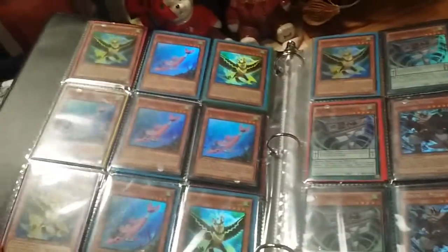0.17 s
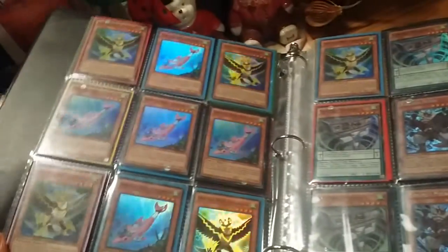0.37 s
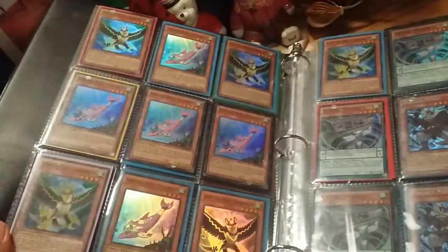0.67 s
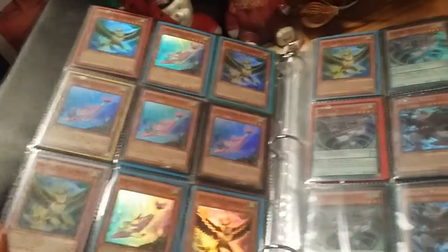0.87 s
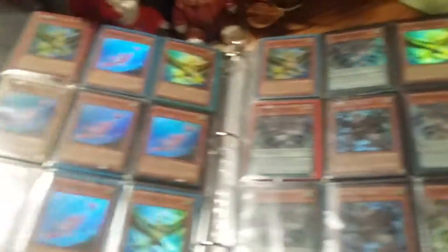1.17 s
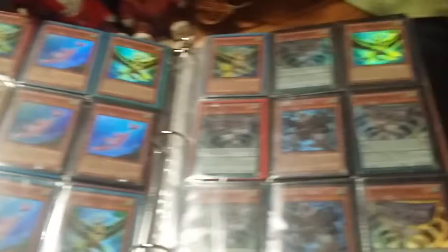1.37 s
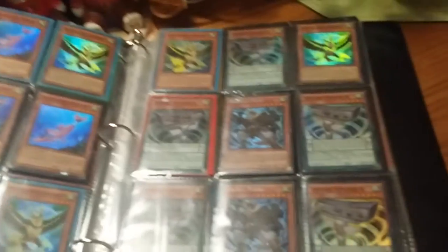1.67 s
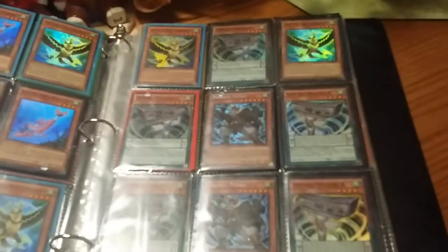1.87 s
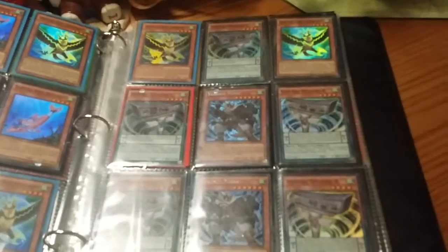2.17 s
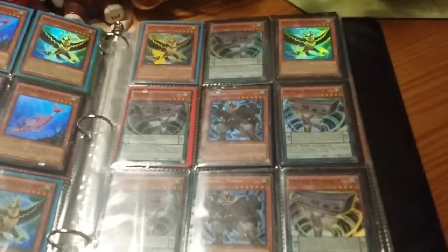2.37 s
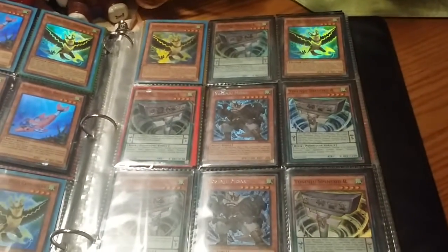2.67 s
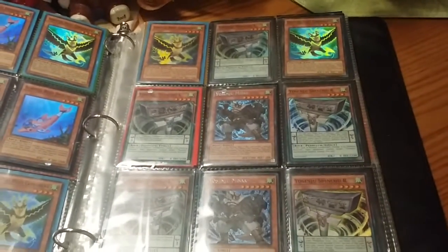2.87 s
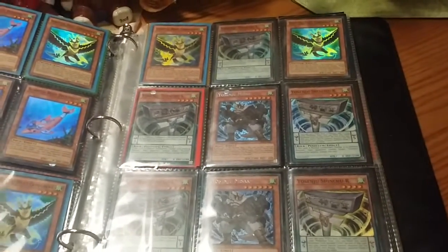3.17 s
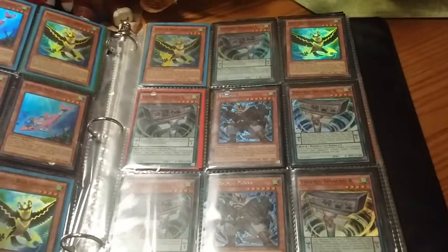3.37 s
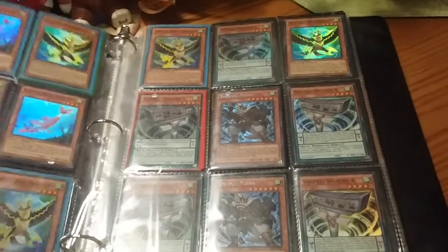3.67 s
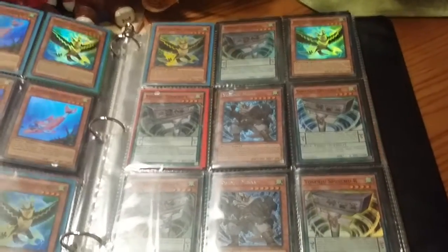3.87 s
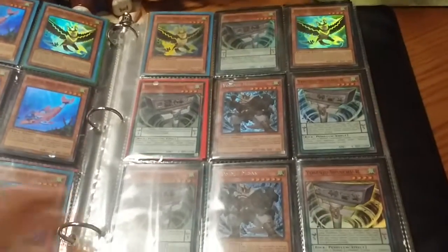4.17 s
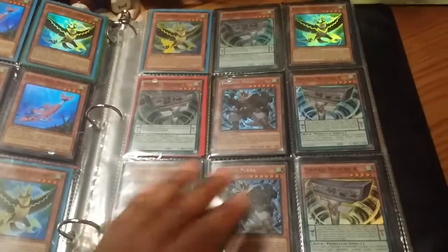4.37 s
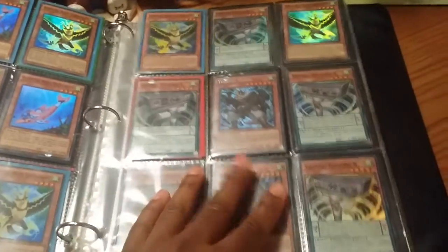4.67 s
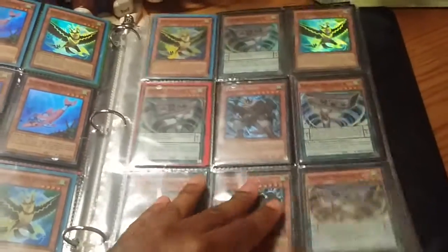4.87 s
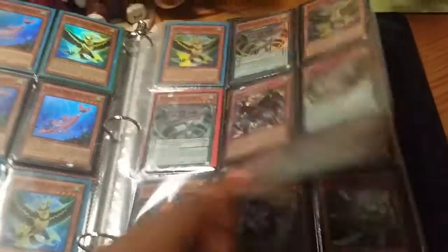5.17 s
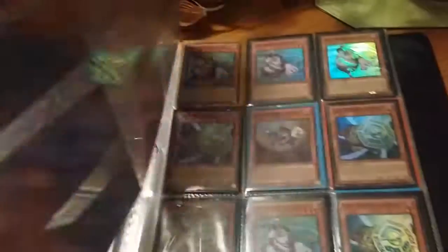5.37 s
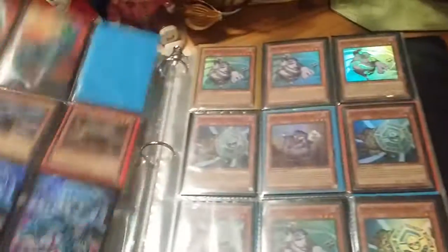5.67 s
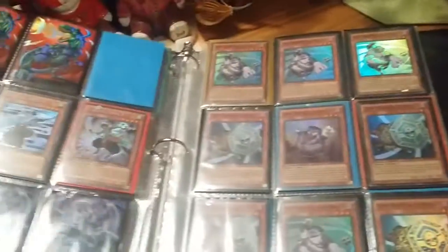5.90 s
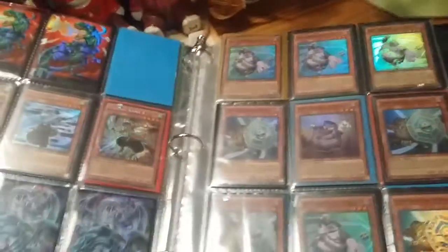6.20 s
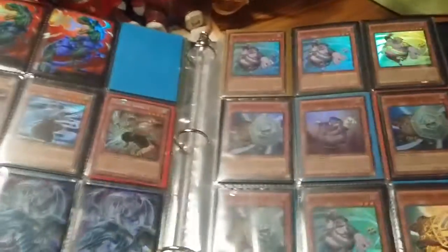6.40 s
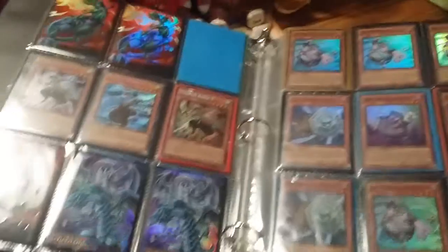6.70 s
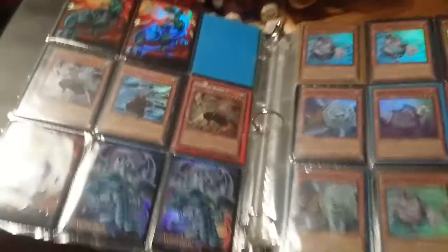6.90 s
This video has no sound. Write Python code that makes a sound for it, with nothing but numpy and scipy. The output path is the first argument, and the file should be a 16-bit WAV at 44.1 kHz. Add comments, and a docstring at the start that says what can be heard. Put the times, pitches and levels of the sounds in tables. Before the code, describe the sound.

Close plastic card pockets rub faintly over a humming room, a hard knock sounds, then a page crackles, flips and slides to rest.

```python
"""A ring binder of sleeved cards lies close by on a table: its plastic pockets slide and crackle,
the binder knocks, and a page is gripped, bent over and left to slide to rest.
Snaps are short noise cracks through film and card colours, sliding is dense random grains, and
knocks are decaying tones with a rattle. Behind it, noise bands make dull scuffs and bumps further off,
and steady tones with coloured noise make the humming room."""
import sys
import numpy as np
from scipy import signal
from scipy.fft import rfft, irfft, next_fast_len
from scipy.io import wavfile
from scipy.ndimage import map_coordinates

SR = 44100
rng = np.random.default_rng(int(sys.argv[2]) if len(sys.argv) > 2 else 0)


def generate_wav(signal):
    """Clip the signal to [-1, 1] and save it as 16-bit WAV at the path in sys.argv[1]."""
    frames = np.transpose(np.atleast_2d(signal))
    scaled = np.clip(frames, -1, 1) * 32767
    pcm = np.round(scaled).astype(np.int16)
    wavfile.write(sys.argv[1], SR, pcm)


N = 310464

# All t60 values are the time [s] to fade by 60 dB; levels are relative unless marked rms.
# appliance motors and mains, the two lowest lines beat: (frequency [Hz], level [dB])
HUM_LINES = [(58.2, -56.7), (61.8, -58.6), (120, -51.3), (210.8, -63), (226.9, -55), (240, -56),
             (269.1, -43.6), (359.9, -57), (450.8, -61), (479.9, -62)]
# narrow bands of the room's drone: (centre [Hz], width [Hz], level [dB rms])
DRONE_BANDS = [(56.7, 8.1, -66), (120.7, 8.1, -64), (254.8, 48, -56), (326, 26, -62.5),
               (362.8, 10.6, -60.5), (580, 79, -64.5), (691, 10, -70)]
# colour of fan air and hiss: (frequency [Hz], level per Hz [dB])
AIR_COLOUR = [(450, -16.5), (800, 3), (1100, 1), (1700, 0), (2200, -5.5), (3000, -7), (4000, -9.5),
              (5200, -12), (7200, -18.5), (9000, -14), (11000, -11.5), (13500, -8.5), (15000, -20.5)]
# colour of the room's low rumble: (frequency [Hz], level per Hz [dB])
RUMBLE_COLOUR = [(25, -21), (40, -10), (55, 7), (90, -2), (140, 3), (190, -0.5), (300, 0.5), (420, -2),
                 (560, -7), (750, -12.5), (1000, -21.5), (2000, -68)]
# dull scuffs and bumps: (time [s], level [dB], centre [Hz], rise [s])
SCUFF_EVENTS = [(0.146, -51.5, 940, 0.018), (0.285, -53, 1770, 0.013), (0.45, -57.5, 1400, 0.046),
                (1.181, -53.5, 1370, 0.02), (1.3, -40, 140, 0.017), (1.275, -49.5, 1350, 0.029),
                (1.55, -55.5, 1340, 0.051), (1.729, -51, 920, 0.068), (1.87, -51, 1170, 0.035),
                (2.222, -44.5, 1060, 0.034), (2.315, -48.5, 1280, 0.021), (2.519, -54, 1220, 0.062),
                (3.947, -40.5, 1660, 0.003), (4.172, -50, 1880, 0.0025), (6.31, -54, 900, 0.0098)]
# how long the room answers: (frequency [Hz], t60 [s])
ROOM_DECAY = [(200, 0.16), (2000, 0.15), (12000, 0.084)]
# the binder meets the table, the page lands on the stack: (time [s], level [dB])
KNOCK_EVENTS = [(1.307, -31), (3.661, -31), (3.718, -16.5), (5.6912, -34), (5.7143, -46)]
# ringing tones of the stiff cover: (frequency [Hz], level [dB], t60 [s])
BOARD_TONES = [(185, -18, 0.13), (485, -11, 0.054), (596, -6, 0.05), (667, -5.5, 0.031), (991, -11.5, 0.05),
               (1600, -16, 0.019), (2070, -19, 0.027)]
# cards clack and slap together: (time [s], level [dB], centre [Hz], half-width [octaves], t60 [s])
CLACK_EVENTS = [(3.5275, -38, 1890, 0.54, 0.017), (3.5374, -42, 1700, 0.45, 0.055),
                (4.782, -40, 4400, 0.33, 0.017), (4.866, -42, 4160, 0.1, 0.045),
                (4.8775, -29, 2170, 0.2, 0.016), (4.8784, -34, 10400, 0.074, 0.012),
                (5.2056, -37.5, 2190, 0.35, 0.0096), (5.462, -41.5, 1700, 0.9, 0.035),
                (5.495, -36, 1730, 0.49, 0.027), (5.691, -35, 4600, 0.45, 0.009),
                (5.691, -40.5, 1400, 0.34, 0.072), (5.7075, -35, 1190, 0.5, 0.027),
                (5.7144, -30, 4150, 0.4, 0.0077), (5.7147, -37.5, 1340, 0.51, 0.082),
                (6.9141, -37, 1150, 0.31, 0.013)]
# the bent film crinkles in runs of ticks: (time [s], length [s], level [dB], middle pitch [Hz])
CRINKLE_RUNS = [(4.774, 0.04, -39, 4330), (4.851, 0.02, -38, 3200), (5.211, 0.05, -40, 3000),
                (5.419, 0.016, -37, 4030), (5.692, 0.035, -39, 2200)]
# the plastic buckles: (time [s], snap level [dB], card level against the snap [dB])
SNAP_EVENTS = [(0.648, -40, -12), (1.627, -37, -18), (3.512, -37, -3), (3.5376, -37, 4), (3.5525, -41, -6),
               (3.6507, -30, 4), (3.6615, -23.5, -2), (3.7467, -25, 1), (3.765, -22.5, 2), (4.791, -35, -5),
               (4.8105, -41, -8), (4.853, -32, 0.5), (4.8794, -26, -2), (5.2056, -31.5, 1),
               (5.2305, -35, 1), (5.4192, -37, 2), (5.5844, -44, 13), (5.684, -29, 1), (5.6902, -23, -5),
               (5.7142, -33, 0), (6.9134, -30, -8)]
# colour of thin plastic: (frequency [Hz], level per Hz [dB])
FILM_COLOUR = [(300, -46), (1500, -2), (2300, -11), (3000, 0), (4100, 9.5), (5500, -11.5), (7000, -2.5),
               (10000, 4), (13300, 11), (15000, -8)]
# colour of card in its pocket: (frequency [Hz], level per Hz [dB])
CARD_COLOUR = [(150, -11), (500, 1), (1100, -1), (2000, -1.5), (3000, -11), (4500, -14), (8000, -21)]
# pockets rub as the binder shifts: (time of full speed [s], swish [dB], card [dB], t60 [s])
SHIFT_STROKES = [(0.403, -60, -51, 0.26), (1.05, -56.5, -56, 0.41), (1.345, -65, -53.5, 0.35),
                 (1.62, -70, -64, 0.2), (2.818, -61, -52.5, 0.49), (4.018, -59, -53, 0.27),
                 (4.462, -59, -64, 0.28), (6.44, -63, -54.5, 1)]
# colour of pockets pressed together: (frequency [Hz], level per Hz [dB])
RUB_COLOUR = [(600, -6), (2000, 1), (4000, -2.5), (6000, -9.5), (9000, -8), (13500, -6)]
# a rubbed pocket sings at its own resonance: (time [s], level [dB], centre [Hz], half-width [octaves])
SING_EVENTS = [(0.38, -57.5, 4140, 0.14), (1.028, -53, 2010, 0.31), (1.035, -55, 3200, 0.3),
               (4.44, -58, 12500, 0.28)]
# fingers crease the page until it snaps free: (time of full speed [s], crackle [dB], card [dB], t60 [s])
GRIP_STROKES = [(4.808, -45.5, -64, 0.2), (4.85, -40.5, -61, 0.046), (4.871, -45, -59, 0.025)]
# colour of a pinched pocket: (frequency [Hz], level per Hz [dB])
CREASE_COLOUR = [(800, -24), (1700, -8), (2400, 2), (3200, 1), (4300, -3), (5500, -5), (7000, -3),
                 (9000, -13), (13000, -4), (15000, -11)]
# the page is touched, lifted, bent over: (time of full speed [s], swish [dB], card [dB], t60 [s])
TURN_STROKES = [(4.787, -48.5, -63, 0.3), (5.218, -51.5, -56.5, 0.36), (5.32, -61, -63.5, 1),
                (5.421, -53, -58, 0.16)]
# the turned page slides to rest in surges: (time of full speed [s], swish [dB], card [dB], t60 [s])
GLIDE_STROKES = [(5.648, -52, -54.5, 0.78), (5.775, -51, -64, 0.29), (5.915, -54, -58.5, 0.47),
                 (5.978, -56, -58, 0.061), (6.065, -57.5, -56, 0.35)]
# colour of a page sliding flat: (frequency [Hz], level per Hz [dB])
SATIN_COLOUR = [(1000, -10), (4200, -5), (7000, -12), (9500, -2), (11500, -3), (13500, 6), (15000, -16)]

# Where a snap's treble starts to fall; it halves for each DULLING_DB more of card behind the film.
EDGE_HZ, DULLING_DB = 8300, 17
# Half-width of a low scuff; a scuff centred on NARROW_HZ is half as wide.
SCUFF_OCTAVES, NARROW_HZ = 1.32, 1440
SCUFF_T60 = 0.32  # seconds
SCUFF_HOLD = 0.54  # full strength lasts this share of the rise time
CLACK_RISE_S = 0.0001
CATCHES_PER_S = 83  # how fast a sliding sheet catches and frees itself
TOP_HZ = 14850


def amp(db):
    """Turn decibels into a plain multiplier."""
    return 10 ** (np.asarray(db) / 20)


def unit(x):
    """Scale a sound to an average (rms) strength of 1."""
    return x / np.sqrt(np.mean(x ** 2) + 1e-20)


def along(points, hz):
    """Read between (frequency, value) points, evenly by pitch."""
    f, value = np.transpose(points)
    return np.interp(np.log(hz + 1), np.log(f + 1), value)


def wobble(rate):
    """Draw a smooth random curve through this many random points a second."""
    knots = rng.standard_normal(int(N * rate / SR) + 4)
    return map_coordinates(knots, [np.arange(N) * rate / SR])


def filtered(x, response):
    """Make each frequency louder or softer by the given response."""
    size = next_fast_len(len(x) + 8192)
    spectrum = rfft(x, size) * response(np.fft.rfftfreq(size, 1 / SR))
    return irfft(spectrum, size)[:len(x)]


def coloured(x, colour):
    """Give a sound a frequency colour, at rms 1."""
    return unit(filtered(x, lambda hz: amp(along(colour, hz))))


def struck(x, colour, size=1024):
    """Pass a sound through a body that answers only after it is hit, with unit energy."""
    cepstrum = irfft(np.log(amp(along(colour, np.fft.rfftfreq(size, 1 / SR)))))
    # Folding this onto positive times puts the answer as early as possible.
    cepstrum[1:size // 2] *= 2
    cepstrum[size // 2 + 1:] = 0
    response = irfft(np.exp(rfft(cepstrum)))
    return signal.fftconvolve(x, response / np.linalg.norm(response))[:len(x)]


def add(track, s, sound):
    """Mix a sound into a track at time s."""
    part = track[round(s * SR):][:len(sound)]
    part += sound[:len(part)]


def burst(centre_hz, octaves, rise, t60, hold=0):
    """A band of noise rises, holds and dies away."""
    t = np.arange(SR // 2) / SR

    def band_shape(hz):
        distance = np.abs(np.log2((hz + 1) / centre_hz) / octaves)
        return 1 / (1 + distance ** 3.48)

    band = unit(filtered(rng.standard_normal(len(t)), band_shape))
    fade = amp(-60 * np.maximum(t - rise - hold, 0) / t60)
    return band * np.minimum(t / rise, 1) * fade


def hum(line_db, waver_db, air_db, rumble_db):
    """Steady motor tones waver slightly over a drone, the fan's air noise and rumble."""
    t = np.arange(N) / SR
    lines, drone = np.zeros(N), np.zeros(N)
    for hz, db in HUM_LINES:
        tone = np.sqrt(2) * np.sin(2 * np.pi * (hz * t + rng.random()))
        lines += amp(db + waver_db * wobble(3.22)) * tone
    for hz, width, db in DRONE_BANDS:
        band = filtered(rng.standard_normal(N), lambda f: 1 / (1 + (2 * (f - hz) / width) ** 4))
        drone += amp(db) * unit(band)
    air = amp(air_db + 0.79 * wobble(3.9)) * coloured(rng.standard_normal(N), AIR_COLOUR)
    rumble = amp(rumble_db) * coloured(rng.standard_normal(N), RUMBLE_COLOUR)
    return amp(line_db) * lines + drone + air + rumble


def scuffs(level_db):
    """Soft contacts swell and die away, blurred by the room; the higher ones are narrower."""
    out = np.zeros(N)
    for s, db, centre_hz, rise in SCUFF_EVENTS:
        octaves = SCUFF_OCTAVES / (1 + (centre_hz / NARROW_HZ) ** 3)
        add(out, s, amp(db + level_db) * burst(centre_hz, octaves, rise, SCUFF_T60, SCUFF_HOLD * rise))
    return out


def room(x):
    """A small furnished room answers with a fading noise tail; the treble dies first."""
    hz, t, noise = signal.stft(rng.standard_normal(SR // 2), SR, nperseg=256)
    fade = amp(-60 * t / along(ROOM_DECAY, hz)[:, None])
    tail = signal.istft(noise * fade, SR, nperseg=256)[1]
    delayed = np.pad(tail / np.linalg.norm(tail), (SR // 200, 0))  # 5 ms late
    return signal.fftconvolve(x, delayed)[:N]


def knocks(attack, rattle_db, rattle_t60, soft_hz):
    """The stiff cover rings briefly and the stacked cards clap against it."""
    out, t = np.zeros(N), np.arange(SR // 4) / SR
    rattle_colour = [(150, -13), (550, -4), (1200, 8.0), (2300, -33), (6000, -42)]  # (Hz, dB per Hz)
    ring = np.zeros(len(t))
    for hz, level, t60 in BOARD_TONES:
        ring += amp(level - 60 * t / t60) * np.cos(2 * np.pi * hz * t)
    for s, db in KNOCK_EVENTS:
        rattle = coloured(rng.standard_normal(len(t)), rattle_colour)
        rattle = rattle * amp(rattle_db - 60 * t / rattle_t60)
        add(out, s, amp(db) * (1 - np.exp(-t / attack)) * (ring + rattle))
    return signal.lfilter(*signal.butter(2, soft_hz, fs=SR), out)  # the padded cover takes the edge off


def clacks(level_db):
    """A card's edge strikes its neighbour; a sheet falling flat rings lower and longer."""
    out = np.zeros(N)
    for s, db, centre_hz, octaves, t60 in CLACK_EVENTS:
        add(out, s, amp(db + level_db) * burst(centre_hz, octaves, CLACK_RISE_S, t60))
    return out


def crinkles(gap_s, spread_db, octaves, cycles):
    """Small dents flip one after another at uneven gaps, each with its own size and pitch."""
    out, t = np.zeros(N), np.arange(SR // 100) / SR
    for s, length, db, centre_hz in CRINKLE_RUNS:
        gaps, sizes, pitches = np.clip(rng.standard_normal(size=(3, 32)), -2, 2)
        delays = gap_s * (np.cumsum(np.exp(gaps / 2)) - 1)
        tick_hz = centre_hz * 2 ** (octaves * pitches)
        for delay, size, hz in zip(delays, sizes, tick_hz):
            if delay < length:
                tick = np.sin(2 * np.pi * hz * t) * amp(-60 * hz * t / cycles)
                add(out, s + delay, amp(db + spread_db * size) * tick)
    return out


def snaps(crack_t60, body_t60, flutter_db, flutter_t60, snap_db, tick_db):
    """Each buckle cracks the film, shakes the card and leaves the sheet fluttering."""
    out, t = np.zeros(N), np.arange(SR // 8) / SR
    flutter = amp(flutter_db - 60 * t / flutter_t60)
    for s, db, body_db in SNAP_EVENTS:
        film_noise, card_noise = rng.standard_normal((2, len(t)))
        # One sharp flip, then smaller ones.
        crack = film_noise * (amp(-60 * t / crack_t60) + flutter) + amp(tick_db) * (t == 0)
        shake = card_noise * (amp(-60 * t / body_t60) + flutter)
        # More card behind the film makes the crack duller.
        edge_hz = EDGE_HZ * 2 ** (-body_db / DULLING_DB)
        pole = np.exp(-2 * np.pi * edge_hz / SR)
        film = signal.lfilter([1 - pole], [1, -pole], struck(crack, FILM_COLOUR))
        card = struck(shake, CARD_COLOUR)
        add(out, s, amp(db + snap_db) * (film + amp(body_db) * card))
    return out


def grains(rate, spread_db):
    """Scatter tiny slips of uneven size, about this many a second."""
    slips = (rng.random(N) < rate / SR) * rng.standard_normal(N)
    return slips * amp(spread_db * np.clip(rng.standard_normal(N), -2, 2))


def swell(t, rise_s, hold_s, t60):
    """A stroke gathers speed until t = 0, holds and dies away."""
    rise = np.exp(-(np.minimum(t, 0) / rise_s) ** 2)
    return rise * amp(-60 * np.maximum(t - hold_s, 0) / t60)


def rustle(strokes, colour, rise_s, hold_s, swish_db, card_db, rate, spread_db, uneven_db):
    """Sliding plastic sticks and slips in dense grains that sound film and card."""
    t, swish, body = np.arange(N) / SR, np.zeros(N), np.zeros(N)
    for s, high_db, low_db, t60 in strokes:
        speed = swell(t - s, rise_s, hold_s, t60)
        swish += amp(swish_db + high_db) * speed
        body += amp(card_db + low_db) * speed
    catching = amp(uneven_db * wobble(CATCHES_PER_S))
    film = unit(struck(grains(rate, spread_db), colour))
    card = unit(struck(grains(rate, spread_db), CARD_COLOUR))
    return catching * (swish * film + body * card)


def shifting(sing_rise_s, sing_t60):
    """Pockets rub as the binder moves; some swell around a resonance."""
    out = rustle(SHIFT_STROKES, RUB_COLOUR, rise_s=0.021, hold_s=0.0081, swish_db=3.0, card_db=-2.0,
                 rate=9000, spread_db=-4.0, uneven_db=2.0)
    for s, db, centre_hz, octaves in SING_EVENTS:
        add(out, s, amp(db) * burst(centre_hz, octaves, sing_rise_s, sing_t60))
    return out


def gripping():
    """Fingers crease a pinched pocket, which crackles in sparse, uneven grains."""
    return rustle(GRIP_STROKES, CREASE_COLOUR, rise_s=0.012, hold_s=0.0046, swish_db=-6.0, card_db=2.0,
                  rate=2900, spread_db=2.5, uneven_db=0)


def turning():
    """The touched, lifted and bent page slips in grains coloured by thin film and card."""
    return rustle(TURN_STROKES, FILM_COLOUR, rise_s=0.029, hold_s=0.015, swish_db=-7.0, card_db=6.5,
                  rate=3500, spread_db=0.0, uneven_db=2.5)


def gliding():
    """The turned page slides flat to rest in surges of fine grains."""
    return rustle(GLIDE_STROKES, SATIN_COLOUR, rise_s=0.032, hold_s=0.013, swish_db=-2.0, card_db=-1.0,
                  rate=5000, spread_db=-1.5, uneven_db=2.0)


def scene():
    """Mix the near binder with its room answer, the scuffs and the hum."""
    binder = knocks(attack=0.00024, rattle_db=-23.0, rattle_t60=0.12, soft_hz=4600)
    binder += clacks(level_db=-2.0)
    binder += crinkles(gap_s=0.0027, spread_db=2, octaves=0.5, cycles=6)
    binder += snaps(crack_t60=0.0044, body_t60=0.005, flutter_db=-17.0, flutter_t60=0.11,
                    snap_db=-5.5, tick_db=-6.0)
    binder += shifting(sing_rise_s=0.024, sing_t60=0.26)
    binder += gripping() + turning() + gliding()
    near = binder + amp(-10.5) * room(binder)
    background = scuffs(level_db=0.05) + hum(line_db=0.5, waver_db=0.5, air_db=-56, rumble_db=-50)
    return (near + background)[None]


def record(dry):
    """Keep nothing above the recorder's band limit."""
    return np.array([filtered(channel, lambda hz: hz < TOP_HZ) for channel in dry])


dry = scene()
out = record(dry)
generate_wav(out)
```